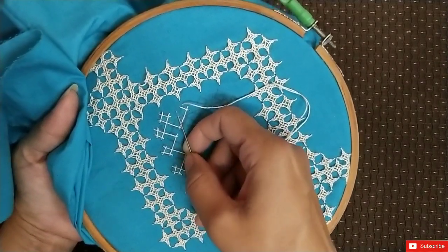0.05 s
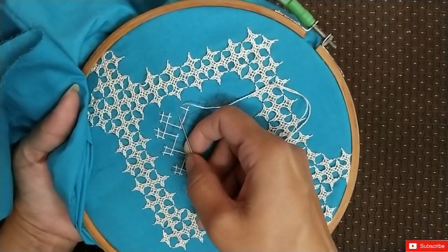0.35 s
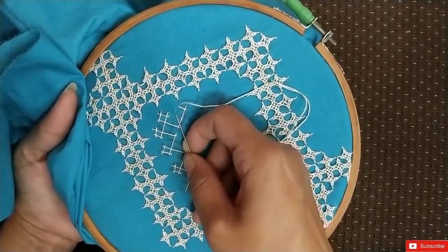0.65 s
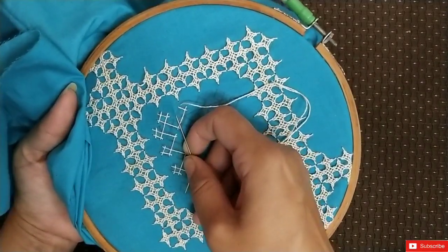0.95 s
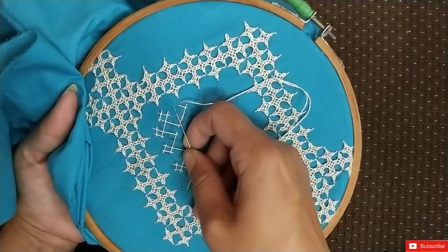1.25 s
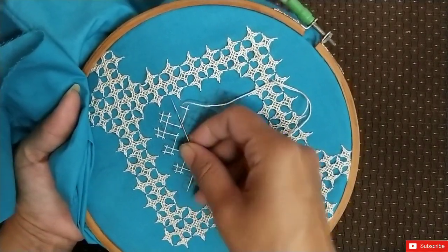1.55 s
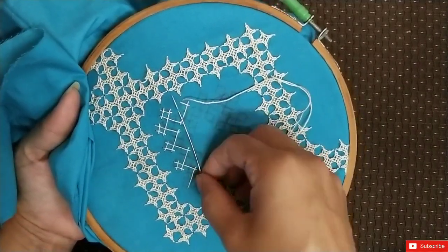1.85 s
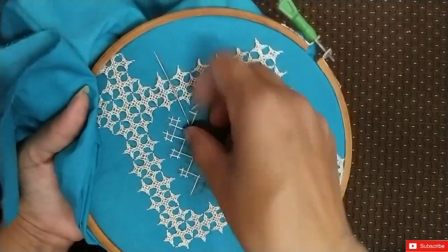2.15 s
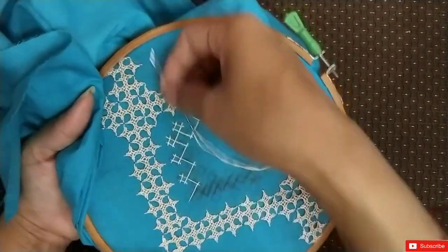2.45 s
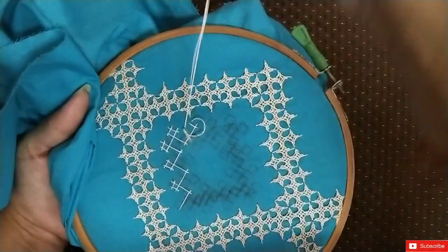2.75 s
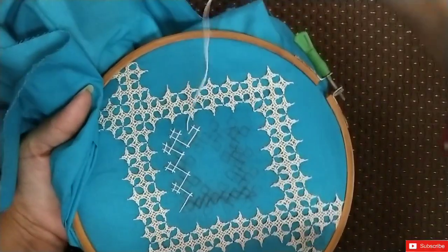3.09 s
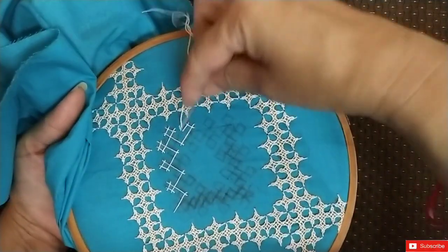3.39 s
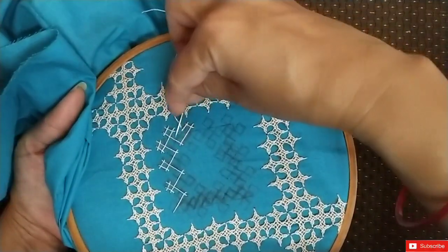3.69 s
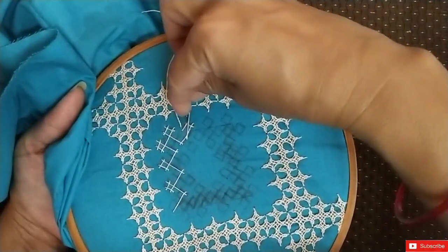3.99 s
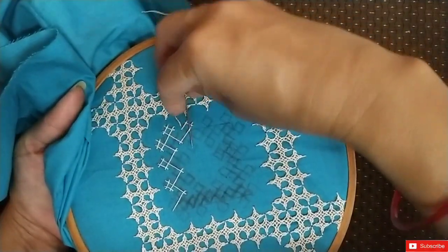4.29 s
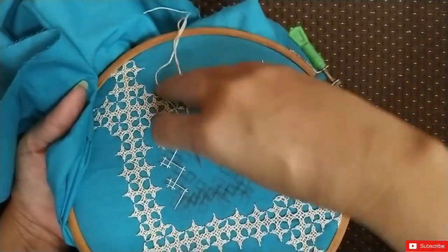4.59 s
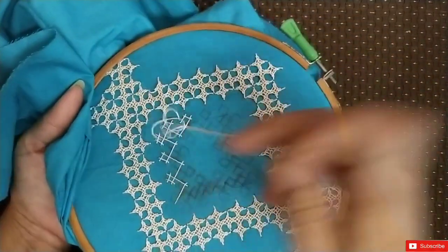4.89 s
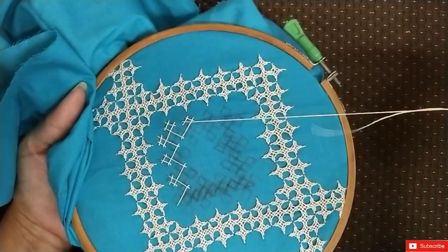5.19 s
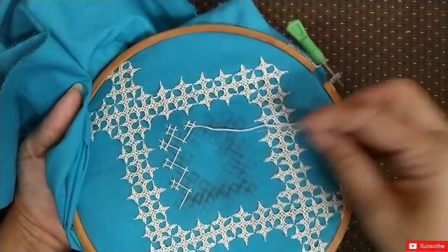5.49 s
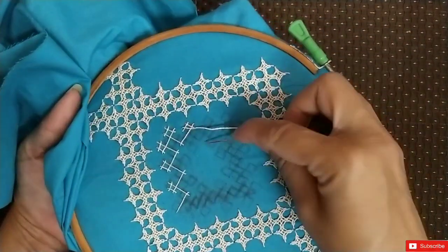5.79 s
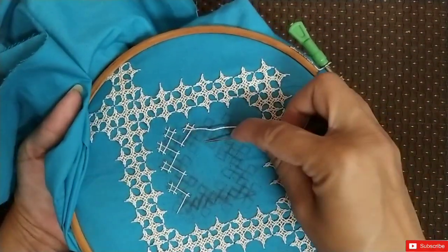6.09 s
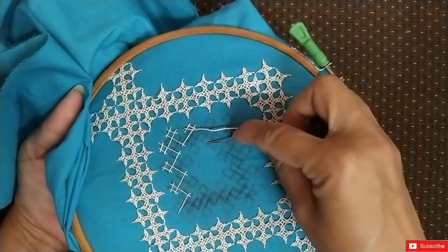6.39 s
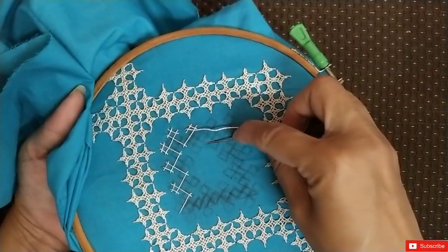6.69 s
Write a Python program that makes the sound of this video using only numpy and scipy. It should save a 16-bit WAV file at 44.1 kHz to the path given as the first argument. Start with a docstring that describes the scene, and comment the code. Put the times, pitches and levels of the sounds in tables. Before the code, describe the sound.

Someone embroiders by hand in a quiet room, close to a small microphone. Fingers knock softly against the hoop and its taut cloth, making dull, irregular bumps, with the strongest right near the start. Low, uneven rubbing comes and goes between them. Now and then a tug on the needle gives a small thump, and thread slides through the weave with a faint hiss. Steady room air lies underneath.

```python
"""A quiet room, with hand embroidery close to a small microphone.
Contacts with the gripped hoop and its taut cloth excite heavily damped vibrations, heard as dull bumps.
Stick-slip friction of the hands on the cloth gives a low, uneven rubbing; needle and thread sliding
through the weave give a faint hiss. Steady room air lies under everything."""
import sys
import numpy as np
from scipy.fft import rfft, irfft, next_fast_len
from scipy.io import wavfile
from scipy.ndimage import map_coordinates

SR = 44100
rng = np.random.default_rng(int(sys.argv[2]) if len(sys.argv) > 2 else 0)


def dump_mix(stems):
    """Bounce the given channels to the path in sys.argv[1] as a 16-bit WAV at rate SR."""
    frames = np.atleast_2d(stems).T  # one column per channel
    limited = np.clip(frames, -1, 1)  # hard clip at full scale
    pcm = np.round(limited * 32767).astype(np.int16)
    wavfile.write(sys.argv[1], SR, pcm)


N = 302085


# soft bumps of the hands on hoop and cloth: (crest time [s], level [dB], frequency [Hz])
HAND_BUMPS = [(0.145, -24, 135), (0.302, -12, 154), (0.335, -22.5, 182), (0.61, -25.5, 161),
              (0.801, -28.5, 123), (0.833, -21, 110), (1.088, -28, 143), (1.726, -25, 121),
              (1.93, -22, 108), (2.038, -19.4, 140), (2.228, -25.5, 140), (2.693, -25, 112),
              (2.921, -21.5, 164), (3.685, -24.5, 142), (4.157, -25, 132), (4.205, -28, 120),
              (4.338, -27.5, 160), (4.635, -20.5, 132), (4.888, -19.5, 156), (4.914, -18, 113),
              (4.965, -24.5, 164), (5.177, -23.5, 146), (5.494, -17, 98), (5.53, -21, 101),
              (5.543, -16.5, 150), (5.627, -26.5, 150), (6.055, -19.5, 190), (6.247, -22, 170),
              (6.306, -21.5, 115)]
# tugs on needle or thread: (crest time [s], level [dB], frequency [Hz], rebound delay [s])
NEEDLE_TUGS = [(1.158, -19, 160, 0.017), (1.766, -19, 148, 0.0113), (3.409, -21.5, 199, .012),
               (4.856, -23, 155, 0.0184), (5.446, -22.5, 200, 0.022)]

def bumps(tug_overtone_db=4.5, rebound_db=0.5, rebound_pitch_ratio=0.83, highpass_hz=45):
    """Superposition: bumps, taps, tugs and the cloth's elastic rebounds add as separate transients."""
    out = np.zeros(N)
    for time, db, hz in HAND_BUMPS + fingertip_taps():
        out += cloth_vibration(time, db, hz)
    for time, db, hz, delay in NEEDLE_TUGS:
        out += cloth_vibration(time, db, hz, tug_overtone_db)
        out += cloth_vibration(time + delay, db + rebound_db, hz * rebound_pitch_ratio, tug_overtone_db)
    return filtered(out, lambda hz: hz ** 2 / (hz ** 2 + highpass_hz ** 2))


def cloth_vibration(time, db, hz, extra_overtone_db=0, overtone_ratio=2.27, sway_hz=72, sway_db=-9):
    """Damped membrane: the hand absorbs the motion in a cycle or two, like a palm on a drum."""
    crest = int(time * SR)
    span = np.arange(max(0, crest - SR // 20), min(N, crest + SR // 10))
    t = span / SR - time
    rise_cycles, fall_cycles = 0.27, 0.45
    envelope = 1 / (np.exp(-t * hz / rise_cycles) + np.exp(t * hz / fall_cycles))
    envelope /= envelope.max()
    fundamental = envelope * np.sin(2 * np.pi * hz * t)
    # a stronger, quicker contact is harder: it excites more of a higher mode, which decays twice as fast
    overtone_db = -14.5 + 0.5 * (db + 20) + 6.5 * np.log2(hz / 150) + extra_overtone_db
    overtone = amp(overtone_db) * envelope ** 2 * np.sin(2 * np.pi * overtone_ratio * hz * t)
    # the whole hoop yields in the grip, lower and slower
    sway = amp(sway_db) * np.sqrt(envelope) * np.sin(2 * np.pi * sway_hz * t)
    out = np.zeros(N)
    out[span] = rng.choice([-1, 1]) * amp(db) * (fundamental + overtone + sway)
    return out


def fingertip_taps(per_second=9, over_rub_db=4.5, scatter_db=1, centre_hz=148, spread_octaves=0.28):
    """Poisson process: random taps scale with the rubbing, as (time [s], level [dB], frequency [Hz])."""
    slots = np.linspace(0, N / SR, N // 512, endpoint=False)
    times = slots[rng.random(len(slots)) < per_second * slots[1]]
    rub_db = 20 * np.log10(stroke_envelope(times) + 1e-9)
    levels = rub_db + rng.normal(over_rub_db, scatter_db, len(times))
    frequencies = centre_hz * 2 ** rng.normal(0, spread_octaves, len(times))
    return list(zip(times, levels, frequencies))


# strokes of the hands on the cloth: (start [s], end [s], midpoint level [dB], growth over stroke [dB])
HAND_STROKES = [(0.093, 0.325, -35, 7), (0.33, 0.513, -40.5, -4), (0.512, 0.767, -36, 0),
                (1.145, 1.275, -32, -13), (1.697, 2.254, -41, -0.5), (2.79, 3.052, -34, 7),
                (3.125, 3.475, -40, 8), (3.55, 4.244, -44, 5.5), (4.3, 4.667, -36.5, 11),
                (4.848, 5.003, -33.5, -10), (5.065, 5.39, -41, 0), (5.437, 5.574, -33.5, 4),
                (5.6, 5.898, -42.5, 3), (6.046, 6.303, -36.5, 10), (6.32, 6.794, -46.5, -11)]

def stroke_envelope(t, edge_s=0.015):
    """Friction follows load: each stroke grows as the fingers press in or fades as they ease off."""
    total = 0
    for start, end, db, growth_db in HAND_STROKES:
        progress = np.clip((t - start) / (end - start), 0, 1)
        gate = (np.tanh((t - start) / edge_s) - np.tanh((t - end) / edge_s)) / 2
        total += gate * amp(db + growth_db * (progress - 0.5))
    return total


# spectrum of cloth rubbing under the hands: (frequency [Hz], relative level [dB])
RUB_SPECTRUM = [(20, -20), (40, -20), (60, -1.5), (105, 3.5), (180, -8), (260, -14), (400, -19.5),
                (800, -48), (2000, -79)]

def rubbing(catch_db=1.5):
    """Stick-slip friction: skin and folds catch and release unevenly on the cloth as the hands move."""
    motion = stroke_envelope(np.arange(N) / SR)
    catching = amp(catch_db * wobble(rate=30))
    return motion * catching * coloured(slips(rate=2500), RUB_SPECTRUM)


# needle or thread sliding through the weave: (centre time [s], duration [s], level [dB])
THREAD_PULLS = [(1.42, 0.14, -58), (2.2, 0.13, -65), (2.56, .12, -67), (4.88, .16, -57)]
# spectrum of thread on cloth: (frequency [Hz], relative level [dB])
THREAD_SPECTRUM = [(500, -30), (1400, -2), (4000, -0.5), (6000, -10), (8000, -21), (10000, -34),
                   (15000, -35)]
# fingers sliding along needle and thread: (centre time [s], duration [s], level [dB])
FINGER_SWISHES = [(2.18, .16, -79), (2.548, .05, -82), (4.9, .16, -89)]
# spectrum of fingers on thread: (frequency [Hz], relative level [dB])
SWISH_SPECTRUM = [(4000, -23), (9000, -1), (15500, -3)]

def thread():
    """Friction noise: dense, tiny slips of fibres on weave and fingers merge into a fine hiss."""
    weave = swells(THREAD_PULLS) * coloured(slips(rate=5000), THREAD_SPECTRUM)
    fingers = swells(FINGER_SWISHES) * coloured(slips(rate=3000), SWISH_SPECTRUM)
    return weave + fingers


# spectrum of steady room air: (frequency [Hz], relative level [dB])
AIR_SPECTRUM = [(25, -26.5), (68, 1), (170, -3.5), (270, -8), (430, 0), (680, -6.5), (1000, -11),
                (2000, -15.5), (3800, -20.5), (5200, -26.5), (7200, -36.5), (9300, -50.5), (13500, -54),
                (15400, -52)]
# broad resonances that colour the air: (centre frequency [Hz], width [Hz], gain [dB])
AIR_RESONANCES = [(453, 87, 0.5), (569, 49, 2.5), (830, 37, 3.5), (1257, 198, 4), (1486, 116, 3.5)]

def room_air(level_db=-42, drift_db=0.4, flutter_db=0.46):
    """Resonance: a few broad peaks colour an even rush of noise that barely wavers in level."""
    def resonances(hz):
        return amp(sum(db * bell(hz, centre, width) for centre, width, db in AIR_RESONANCES))

    rush = filtered(rng.standard_normal(N), resonances)
    waver_db = drift_db * wobble(rate=3.19) + flutter_db * wobble(rate=30)
    return amp(level_db + waver_db) * coloured(rush, AIR_SPECTRUM)


def slips(rate):
    """Shot noise: stick-slip releases of either sign at random moments, on average rate a second."""
    return (rng.random(N) < rate / SR) * rng.standard_normal(N)


def swells(rows):
    """Amplitude envelope: one bell-shaped swell for each sliding movement."""
    t = np.arange(N) / SR
    return sum(amp(db) * bell(t, centre, duration) for centre, duration, db in rows)


def bell(x, centre, width):
    """Gaussian curve of height 1, whose width is two standard deviations."""
    return np.exp(-2 * ((x - centre) / width) ** 2)


def wobble(rate):
    """Random modulation: a smooth curve through rate random values a second."""
    knots = rng.standard_normal(int(N * rate / SR) + 4)
    return map_coordinates(knots, [np.arange(N) * rate / SR])


def coloured(x, spectrum):
    """Spectral shaping: x takes a spectrum interpolated in log frequency and is scaled to rms 1."""
    frequencies, levels = np.transpose(spectrum)
    shaped = filtered(x, lambda hz: amp(np.interp(np.log(hz + 1), np.log(frequencies + 1), levels)))
    return shaped / np.sqrt(np.mean(shaped ** 2) + 1e-20)


def filtered(x, response):
    """Linear filtering: the spectrum of x is multiplied by a frequency response."""
    size = next_fast_len(N + SR // 2)
    return irfft(rfft(x, size) * response(np.fft.rfftfreq(size, 1 / SR)), size)[:N]


def amp(db):
    """Decibel scale: 20 dB is a factor of ten in amplitude."""
    return 10 ** (np.asarray(db) / 20)


def scene():
    """Superposition: hoop, hands, thread and room air add in one channel."""
    return (bumps() + rubbing() + thread() + room_air())[None]


def record(dry, cutoff_hz=15550):
    """Band limiting: an ideal low-pass filter passes nothing above the cutoff."""
    return filtered(dry[0], lambda hz: hz < cutoff_hz)[None]


dry = scene()
out = record(dry)
dump_mix(out)
```